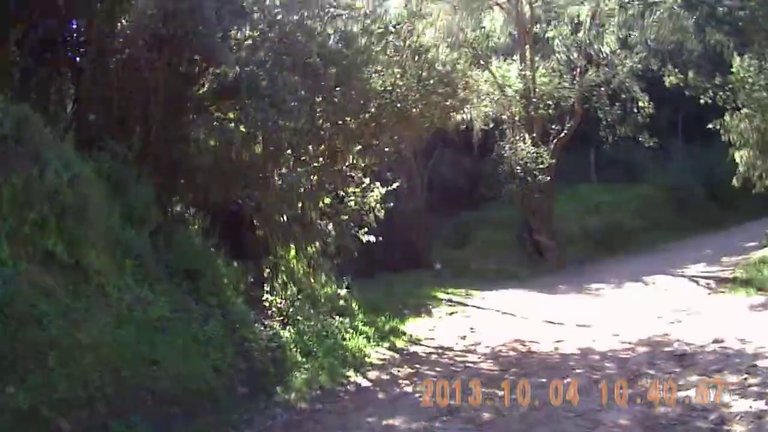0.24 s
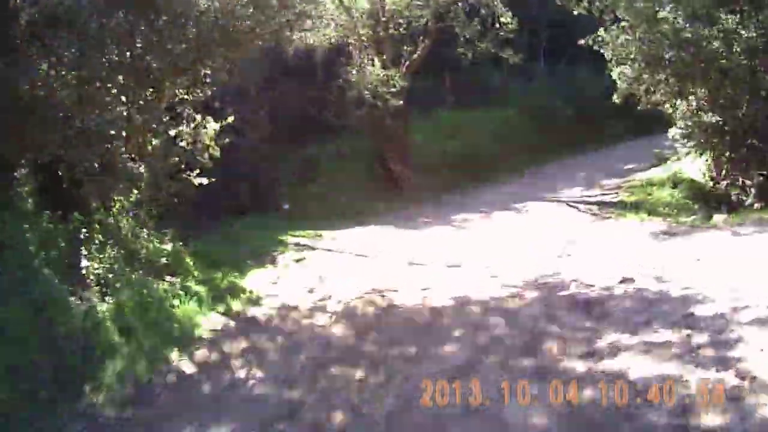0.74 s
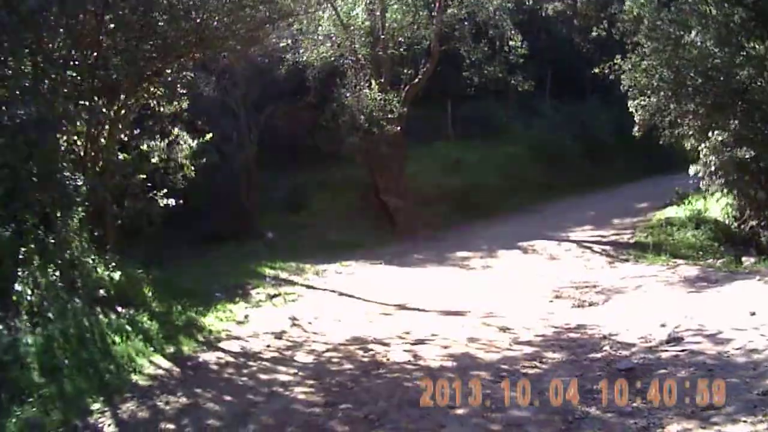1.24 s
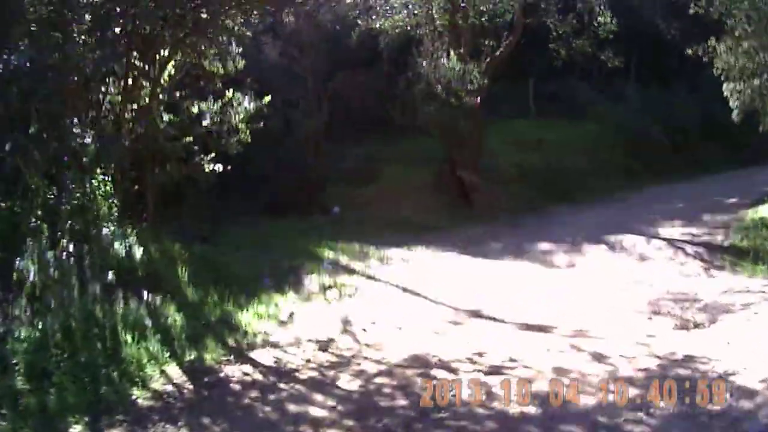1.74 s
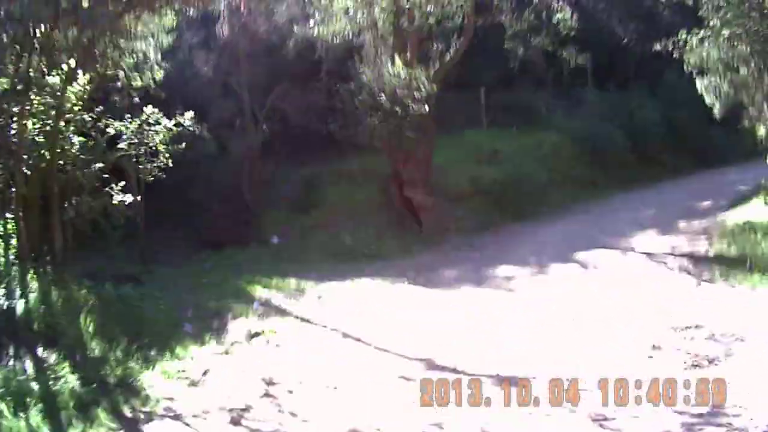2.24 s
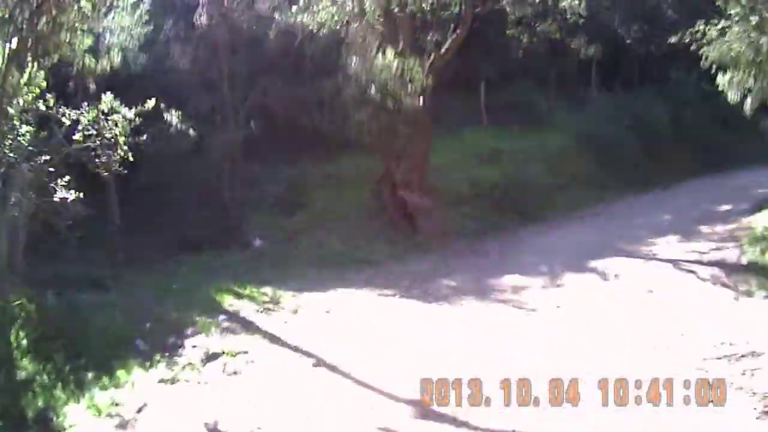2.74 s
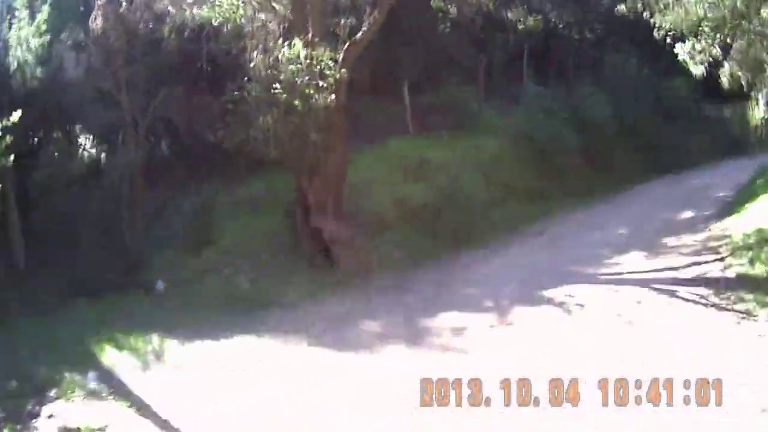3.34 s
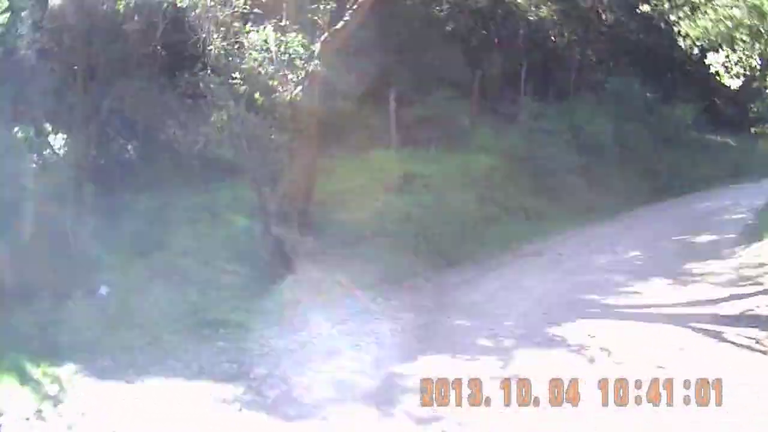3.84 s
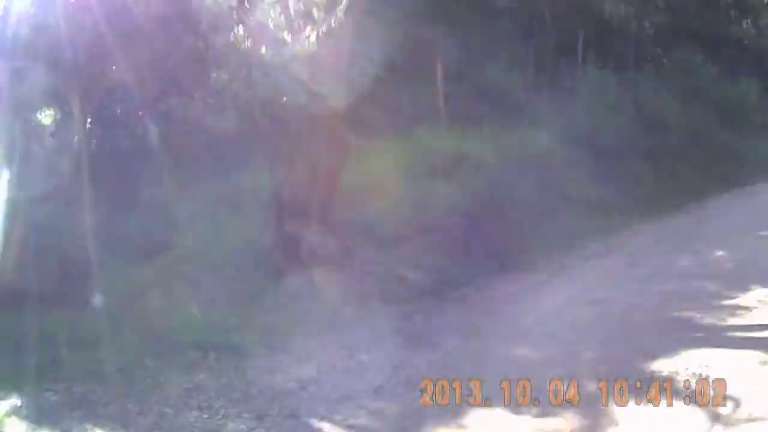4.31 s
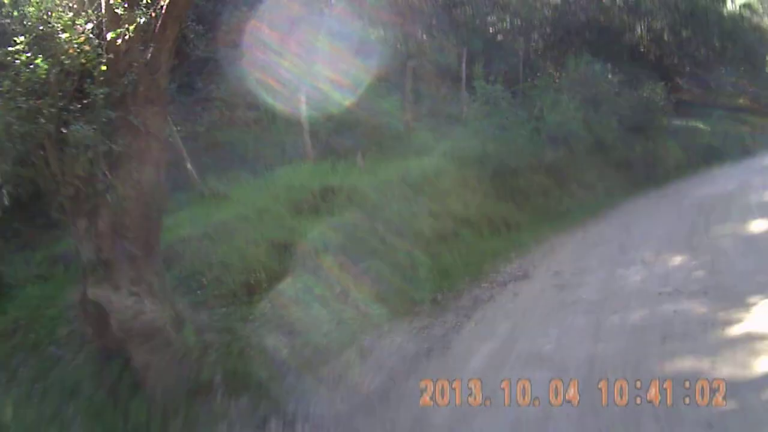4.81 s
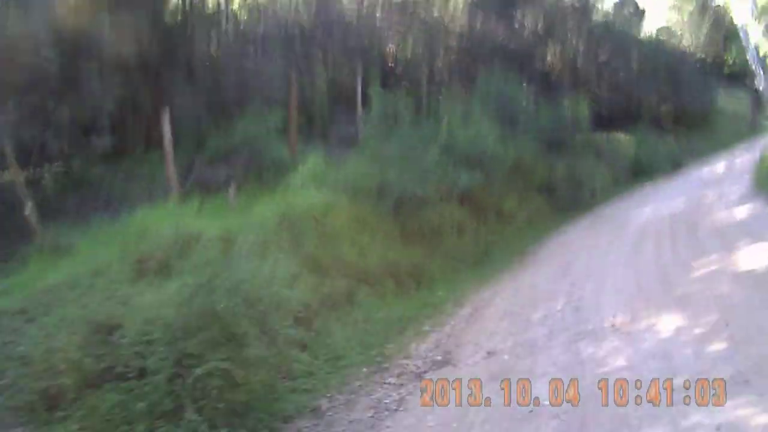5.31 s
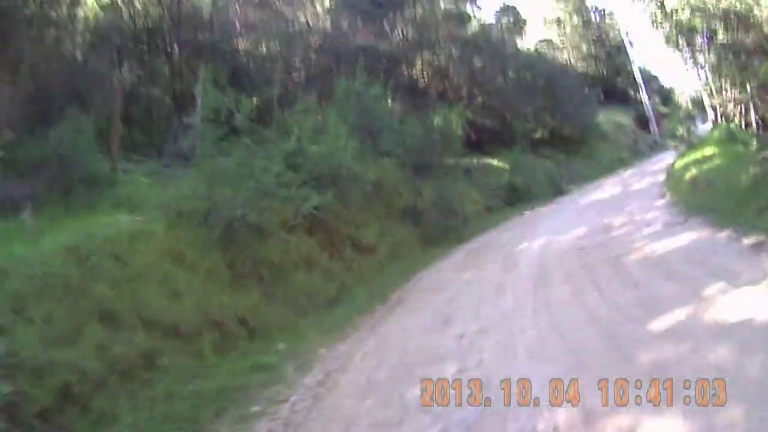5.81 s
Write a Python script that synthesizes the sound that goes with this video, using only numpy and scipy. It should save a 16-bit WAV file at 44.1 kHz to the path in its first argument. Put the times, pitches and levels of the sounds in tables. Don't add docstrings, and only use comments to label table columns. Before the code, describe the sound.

Bicycle tyres rumble and crunch over loose gravel, with hard clattering knocks on the camera mount, an early brake groan and low wind buffeting.

```python
import sys
import numpy as np
from scipy import signal
from scipy.io import wavfile
from scipy.ndimage import uniform_filter1d

SR = 44100
rng = np.random.default_rng(int(sys.argv[2]) if len(sys.argv) > 2 else 0)


def ratio(d):
    e = np.asarray(d, float) / 20
    return 10 ** e


def master(y):
    cut = np.clip(np.atleast_2d(y).T, -1, 1)
    pcm = np.round(cut * 32767)
    wavfile.write(sys.argv[1], SR, pcm.astype(np.int16))


N = 267246


def in_time(rows):
    s, *columns = np.transpose(rows)
    return [np.interp(np.arange(N) / SR, s, c) for c in columns]


def rms_one(x):
    return x / np.sqrt(np.mean(x ** 2) + 1e-20)


def drift(rate_hz):
    r = np.exp(-2 * np.pi * rate_hz / SR)
    settling = 20000
    slow = signal.lfilter([1], [1, -2 * r, r * r], rng.standard_normal(N + settling))
    return rms_one(slow[settling:])


def resonance(x, hz, width_hz):
    r = np.exp(-np.pi * width_hz / SR)
    poles = [1, -2 * r * np.cos(2 * np.pi * hz / SR), r * r]
    return signal.lfilter([(1 - r * r) / 2, 0, (r * r - 1) / 2], poles, x + 1e-18)


def body(x, modes):
    total = 0
    for k, (hz, width_hz, db) in enumerate(modes):
        total = total + (-1) ** k * ratio(db) * resonance(x, hz, width_hz)
    return total


def grains(per_s, spread_db):
    sizes = ratio(spread_db * np.minimum(rng.exponential(1, N), 4)) * rng.choice([-1, 1], N)
    return rms_one(sizes * (rng.random(N) < per_s / SR))


def tread():
    knob_phase = np.cumsum(68 * ratio(3.2 * drift(20))) / SR
    slaps = np.diff(np.floor(knob_phase), prepend=0)
    slaps = slaps * ratio(3.65 * np.clip(rng.standard_normal(N), -2, 1.2))
    fade = np.exp(-1000 / 1.95 / SR)
    return rms_one(signal.lfilter([1], [1, -2 * fade, fade * fade], slaps))


def road():
    # time in seconds, jolting in dB.
    smooth_bed = [(0, -16.5), (.07, -33.5), (.8, -28), (1.1, -29), (1.55, -29.5), (1.78, -24.5),
                  (1.95, -31), (2.5, -21), (3.38, -25), (3.55, -25.5), (3.8, -22), (4.05, -24.5),
                  (4.67, -26.5), (5.05, -26), (5.3, -30.5), (5.45, -25), (5.72, -26.5), (6.06, -18.5)]
    # start in seconds, length in seconds, jolting in dB,
    # low buffeting in dB relative to the jolting.
    rough_stretches = [(0.095, 0.1, -21, -1.5), (0.2, .22, -11.5, -7), (0.439, 0.18, -16.5, -12.5),
                       (0.593, 0.17, -22.5, -5), (0.716, 0.048, -10, -6.5), (0.78, 0.11, -20.5, 2),
                       (1.138, 0.12, -15.5, -1.5), (1.274, 0.13, -8.5, -5), (1.409, 0.066, -15, -2),
                       (1.498, 0.077, -13.5, -5.5), (1.603, 0.13, -18, -3), (2.038, 0.032, -15.5, -3),
                       (2.119, 0.17, -24, 4.5), (2.257, 0.12, -16, -6), (2.37, 0.082, -19.5, -3.5),
                       (2.574, 0.24, -15, -0.5), (2.794, 0.2, -14.5, -3), (3.004, 0.16, -7.5, -5),
                       (3.204, 0.12, -7, -0.5), (3.391, 0.12, -19.5, -4), (3.626, 0.12, -12.5, -6),
                       (3.837, 0.16, -22.5, 3.5), (4.206, 0.059, -17, -1), (4.302, 0.14, -12.5, -0.5),
                       (4.487, 0.11, -14.5, -0.5), (4.703, 0.2705, -12.5, 0), (5.099, 0.13, -17.5, -4.5),
                       (5.52, 0.13, -16.5, -4), (5.744, 0.037, -11, -16), (5.84, .155, -13.5, -1)]
    rise_s, settle_s = 0.021, 0.026
    breeze_db, gust_lag_s = -26, 0.05
    t = np.arange(N) / SR
    jolt_power, buffet_power = ratio(2 * in_time(smooth_bed)[0]), ratio(2 * breeze_db)
    for s, length_s, db, low_db in rough_stretches:
        rise = np.clip((t - s) / rise_s, 0, 1) ** 2
        shape = rise * np.exp(-4 * np.clip(t - s - length_s, 0, None) / settle_s)
        jolt_power = jolt_power + ratio(2 * db) * shape
        buffet_power = buffet_power + ratio(2 * (db + low_db)) * shape
    buffet_power = uniform_filter1d(buffet_power, int(gust_lag_s * SR))
    return 10 * np.log10(jolt_power), 10 * np.log10(buffet_power)


def frame_shake(shake_db, slaps):
    # frequency in Hz, width in Hz, level in dB.
    mount_modes = [(229.6, 50.4, 6.5), (309.5, 39.8, 1.5), (396.6, 53.7, 0), (472, 246, -19.5)]
    jolts = grains(900, spread_db=4.0) * (1.22 + slaps)
    edges = ratio(-30.0) * signal.lfilter([1], [1, -.93], jolts)
    mount_ring = signal.lfilter([.12], [1, -.88], body(jolts, mount_modes))
    return ratio(shake_db - 2.5) * rms_one(mount_ring + ratio(-19.5) * edges)


def gravel(gravel_db, slaps):
    # frequency in Hz, width in Hz, level in dB.
    case_modes = [(1098, 300, -5), (1577.6, 223, 5.5), (1704, 315, 0.5), (2650, 1750, -11.5),
                  (3037, 460, -7), (4175, 1500, -6)]
    rung = 0
    for hz, width_hz, db in case_modes:
        crunch = grains(3000, spread_db=-2.0) * (0.18 + slaps)
        ring = resonance(resonance(crunch, hz, width_hz), hz, 0.6 * width_hz)
        rung = rung + ratio(db) * ring
    return ratio(gravel_db - 3.5) * rms_one(rung)


def knocks(jolt_db):
    # time in seconds, broad crack in dB, case ring in dB, mount thump in dB.
    rocks = [(0.385, 1.5, -2, 7.5), (1.351, 3, -3.5, -18), (1.758, -20, -11.5, -28), (2.3072, 0.5, -7, 3.5),
             (2.3247, 3.5, 0, 5.5), (2.403, -14, -23, -34), (2.423, 15, -14, 0.5), (2.4542, -9.5, -2, 0),
             (2.7521, -1, -4.5, -1.5), (2.8431, 5.5, 0.5, 0), (2.88, 4.5, -4, -4), (2.8999, 7, -11.5, -15),
             (2.94, 10, -10, 3), (2.9563, 9.5, -15, -21.5), (2.9981, -1, -18, -22), (3.0565, 7.5, -12, -11),
             (3.1337, -2, -14, 1.5), (3.1554, 4.5, -1.5, -12), (3.464, 2.5, -7.5, 1),
             (3.5023, 7.5, -27.5, -16), (3.678, -2.5, -7.5, -5), (3.705, 3.5, -7, -22),
             (3.7387, 4.5, -13, -2), (4.3286, -7, -17.5, -20.5), (4.583, 5.5, 1, -6),
             (4.8591, 2, -12.5, -29), (4.8795, 5.5, -30, -19.5), (5.5629, 0.5, -10, -6.5),
             (5.6407, 2.5, -7.5, -1), (5.756, -2, -10, -16)]
    # time in seconds, mount thump in dB, case ring in dB.
    hollows = [(0.2037, -8.5, -12), (0.2469, -10, -9.5), (0.2677, -4, -12.5), (0.2955, 0, -4.5),
               (1.1504, 1, -6), (1.1909, -20, -16), (1.2096, -9, -4.5), (1.3006, 6.5, 2),
               (1.515, -5.5, -10), (1.6612, -2, -12), (2.5459, -12, -21), (2.607, -6, -2.5),
               (2.6827, -6.5, -6), (2.7199, -15, -13), (2.8229, -0.5, -4), (3.0195, 3, -16.5),
               (3.033, 6, -5), (3.2034, -15, -14), (3.4437, -20.5, -20), (3.6615, 2.5, -13),
               (4.3096, -6, -12), (4.4228, 1.5, -3.5), (4.5247, -10, -7), (4.9628, 3.5, -2.5),
               (5.1334, -5.5, -20), (5.5269, -11, -12), (5.5823, 7.5, -4.5), (5.8551, -9, -20),
               (2.6524, -8.5, -6.5), (5.9396, -9.5, -7.5)]
    # time in seconds, case ring in dB, bright ring in dB relative to the case.
    taps = [(0.7372, 9, -7), (0.8226, -14, -18), (0.9541, -8.5, 1.5), (1.0007, -3.5, -10),
            (1.051, -17.5, -5), (1.24, -11, -3.5), (2.0645, -10, -3.5), (2.1288, -17.5, 9.5),
            (2.233, -12, -14), (3.353, -21, 3), (2.767, -8.5, 2.5), (3.2224, -7.5, -15),
            (3.2948, 5.5, -1.5), (3.641, -15, -19), (3.921, -18, -11), (4.0822, -14, -16),
            (4.268, -18, -27), (4.3705, -7, -4.5), (4.5085, -4, -6), (4.7097, -9, -19.5),
            (4.7396, -21, -22), (4.78, -4, -14.5), (4.8325, -3.5, -32), (5.1116, -14.5, -27),
            (5.1707, -6.5, -22), (5.1953, 31.5, -5.5), (5.3573, 10, -2), (5.884, -4.5, -19.5),
            (5.9534, -6.5, -10), (5.9865, -9.5, -10.5)]
    # time in seconds, case ring in dB.
    rattle = [(.9131, -13), (1.18, -6.5), (1.3279, 1), (1.3603, 4.5), (1.4212, -2.5), (1.552, -7.5),
              (1.6963, -7), (1.722, -9), (1.7928, -10.5), (2.3413, 2.5), (2.3554, -2), (2.4334, -1.5),
              (2.574, -10), (2.6254, 0), (2.859, 3.5), (3.0759, 2.5), (3.2575, -9), (3.2755, 12),
              (3.4818, -9), (3.9025, -4), (4.4054, -1.5), (4.9172, -1), (4.6, -1), (5.0125, -13),
              (5.3879, -14.5), (5.4194, -12.5), (5.6063, 0.5), (5.667, -9), (5.8993, -12), (6.0122, -12.5)]
    rows = [(s, case, case - 13, thump, crack) for s, crack, case, thump in rocks]
    rows += [(s, case, case - 10, thump, case - 11.5) for s, thump, case in hollows]
    rows += [(s, case, case + bright, case - 14.5, case - 27.5) for s, case, bright in taps]
    ticks = np.cumsum(.045 * ratio(4.5 * rng.standard_normal(130)))
    ticks = ticks[ticks < N / SR]
    tick_db = jolt_db[(ticks * SR).astype(int)] + 3
    light = np.vstack([rattle, np.c_[ticks, tick_db]])
    colours_db = np.array([-5.5, -18, 0.5, -7.5]) + rng.normal(0, 2.9, (len(light), 4))
    return np.vstack([rows, np.c_[light[:, 0], light[:, 1:] + colours_db]])


def struck(at, peak_db, hz, width_hz, scatter_ms, clean=0):
    t = np.arange(1500) / SR
    contact = rng.standard_normal((len(at), len(t))) + clean * np.sin(2 * np.pi * hz * t)
    chatter = contact * np.sqrt(t) * np.exp(-t * 1000 / scatter_ms)
    rings = resonance(resonance(chatter, hz, width_hz), hz, 2.18 * width_hz)
    rings = rings * (ratio(peak_db) / np.abs(rings).max(axis=1))[:, None]
    out = np.zeros(N + len(t))
    np.add.at(out, at[:, None] + np.arange(len(t)), rings)
    return out[:N]


def bumps(jolt_db):
    s, case_db, bright_db, thump_db, crack_db = knocks(jolt_db).T
    at = (s * SR).astype(int)
    case = struck(at, case_db, 1670, 293, scatter_ms=1.01, clean=.25)
    bright = struck(at, bright_db, 3100, 600, scatter_ms=1.3, clean=.15)
    thump = struck(at, thump_db - 5.0, 262.6, 244, scatter_ms=2.98)
    push = struck(at, thump_db - 16.5, 82, 98, scatter_ms=4.8)
    crack = struck(at, crack_db, 730, 1030, scatter_ms=1.11)
    return case + bright + thump + push + crack


def brake():
    # time in seconds, pitch in Hz, level in dB.
    groan = [
        (.15, 276, -21),
        (.192, 277.2, -26.5),
        (.202, 274.4, -8),
        (.45, 272.6, -6),
        (.562, 280.7, -7),
        (.572, 266.9, -14.5),
        (.72, 273, -12.5),
        (.76, 253.8, -14.5),
        (.79, 258, -19),
    ]
    pitch_hz, level_db = in_time(groan)
    waver = rms_one(resonance(rng.standard_normal(N), 11, 10))
    phase = 2 * np.pi * np.cumsum(pitch_hz * (1 + .014 * waver)) / SR
    t = np.arange(N) / SR
    held = np.clip((t - groan[0][0]) * 60, 0, 1) * np.clip((groan[-1][0] - t) * 60, 0, 1)
    hiss = ratio(-17.5) * resonance(rng.standard_normal(N), 2800, 2500)
    return held * ratio(level_db + 5.0 + 1.4 * drift(49)) * (np.sin(phase) + hiss)


def long_thump():
    start_s, pitch_hz = 5.756, 260.7
    t = np.arange(N) / SR - start_s
    held = np.clip(t * 900, 0, 1) * np.clip((.034 - t) * 150, 0, 1)
    return ratio(-4.5) * held * np.sin(2 * np.pi * pitch_hz * t)


def wind(wind_db):
    # frequency in Hz, width in Hz, level in dB.
    port_modes = [(33.84, 9.3, -2), (54, 13, -1), (105.2, 30, -3.5)]
    gusts = rng.standard_normal(N) * ratio(1.2 * drift(20.0))
    return ratio(wind_db - 1.5) * rms_one(signal.lfilter([.03], [1, -.97], body(gusts, port_modes)))


def scene():
    jolt_db, wind_db = road()
    smooth_db = -27.5
    above_smooth_db = jolt_db - smooth_db
    shake_db = 5 + smooth_db + 0.9 * above_smooth_db
    gravel_db = -4 + smooth_db + 1.096 * above_smooth_db
    slaps = tread()
    rolling = frame_shake(shake_db, slaps) + gravel(gravel_db, slaps) + bumps(jolt_db)
    return (rolling + brake() + long_thump() + wind(wind_db))[None]


def roll_off(x):
    return signal.sosfilt(signal.butter(12, 16480, fs=SR, output="sos"), x)


def record(dry):
    converter_top, output_top = .745, .717
    narrow = signal.resample_poly(dry, 80, 441, axis=1)
    narrow = np.clip(narrow, -converter_top, converter_top)
    narrow = signal.lfilter([.86, .86], [1, .72], narrow)
    smoother = signal.firwin(441 * 29 + 2, 1 / 441, window=("kaiser", 9))
    wide = signal.resample_poly(narrow, 441, 80, axis=1, window=smoother)
    wide = np.pad(wide, ((0, 0), (0, 10)))[:, :N]
    return roll_off(np.clip(wide, -output_top, output_top))


dry = scene()
out = record(dry)
master(out)
```